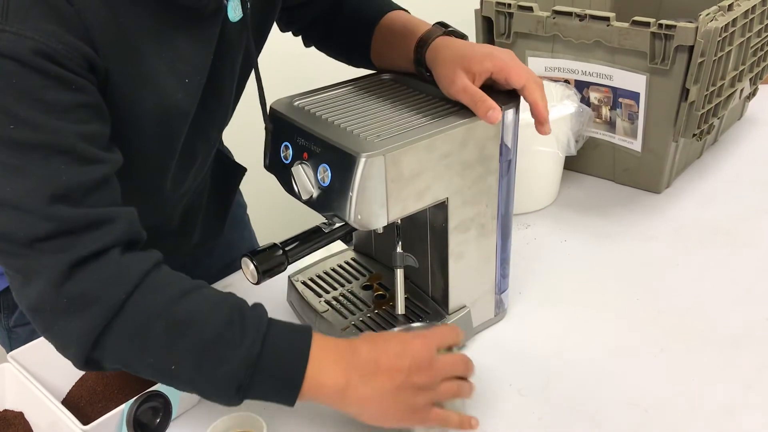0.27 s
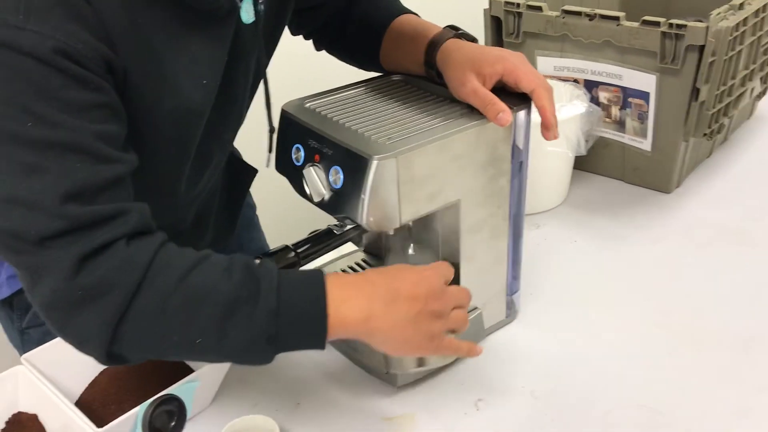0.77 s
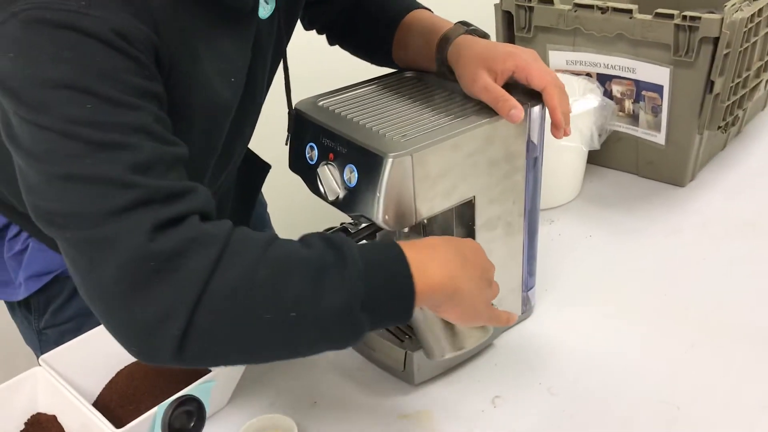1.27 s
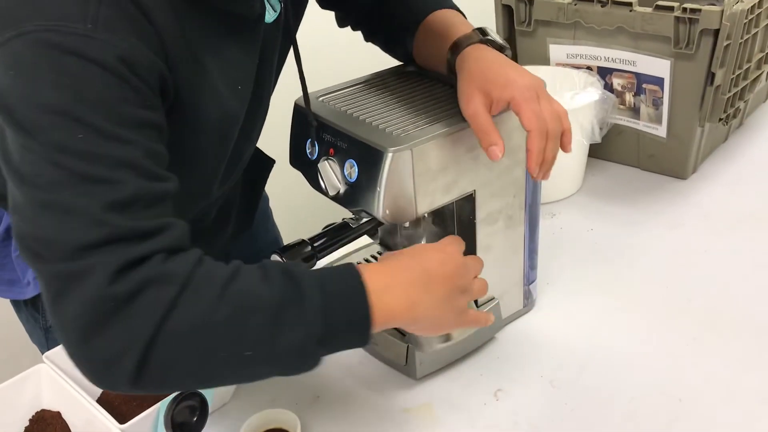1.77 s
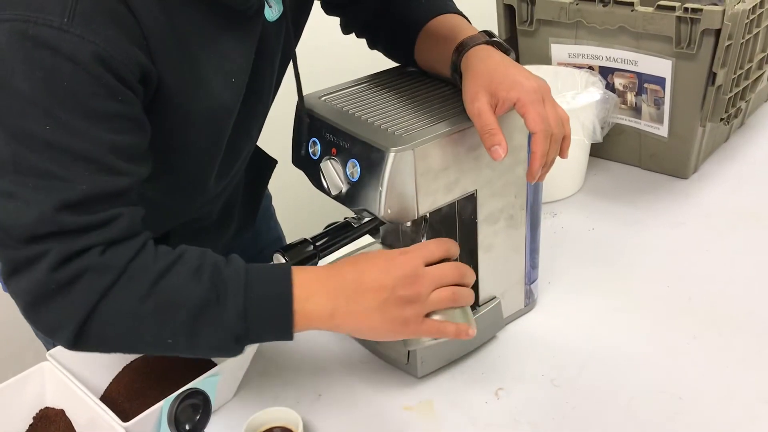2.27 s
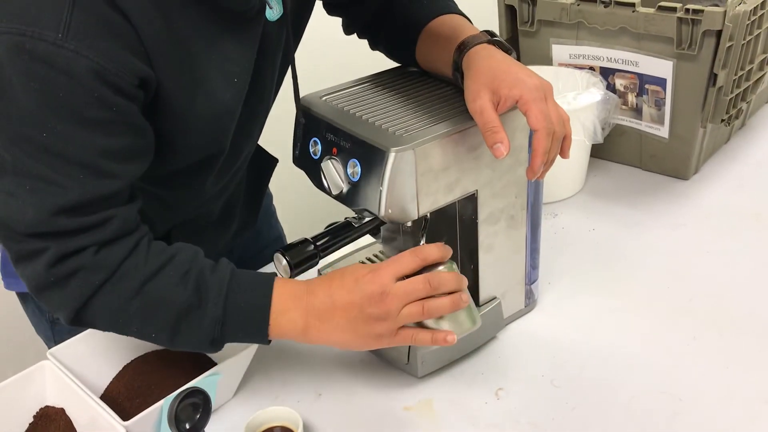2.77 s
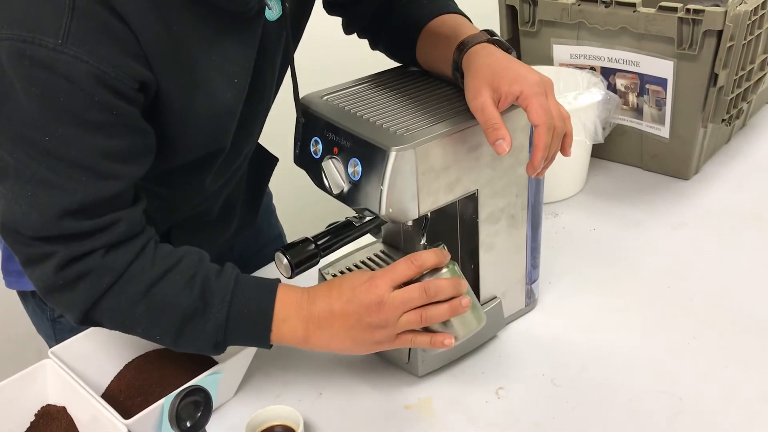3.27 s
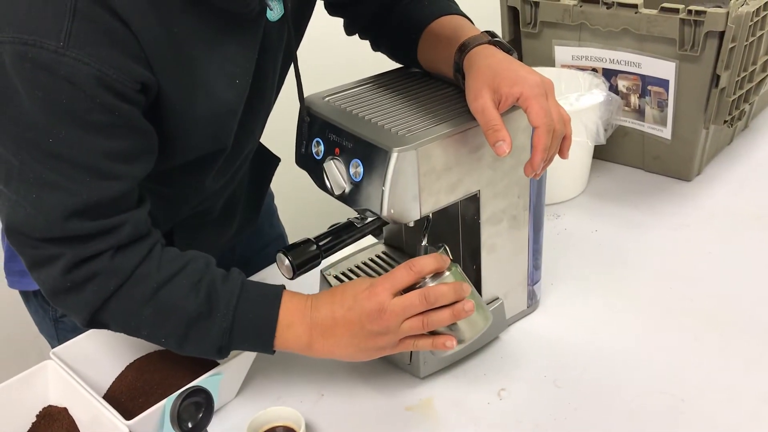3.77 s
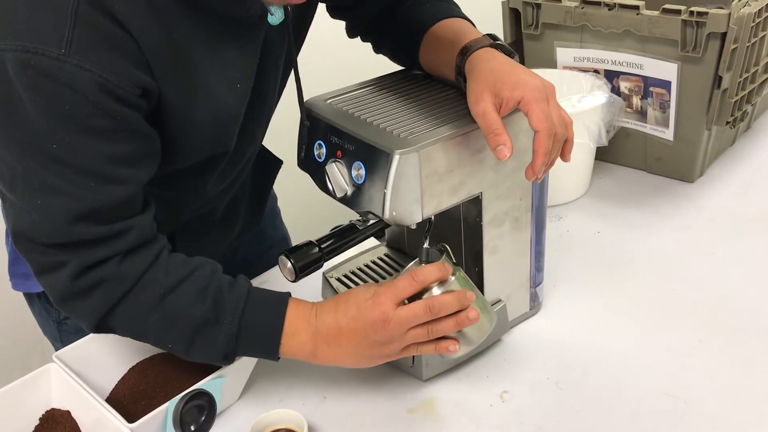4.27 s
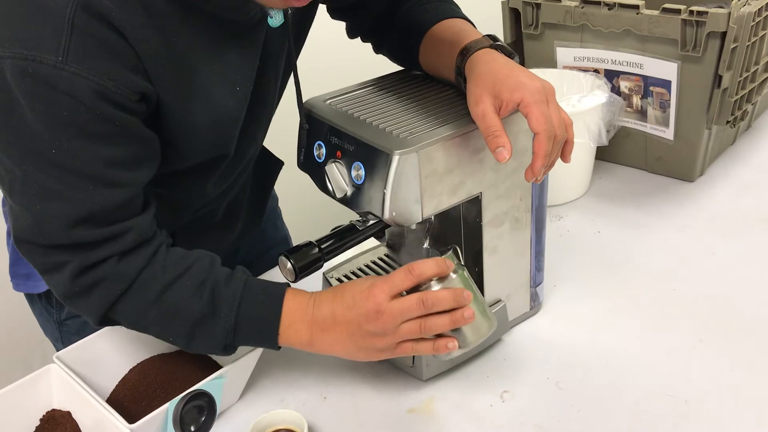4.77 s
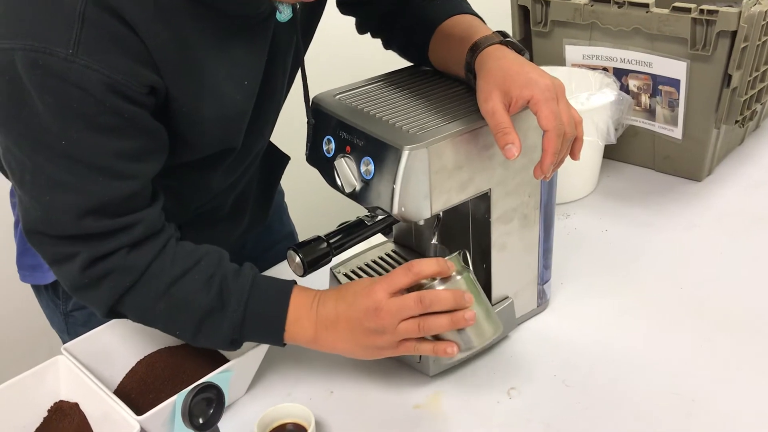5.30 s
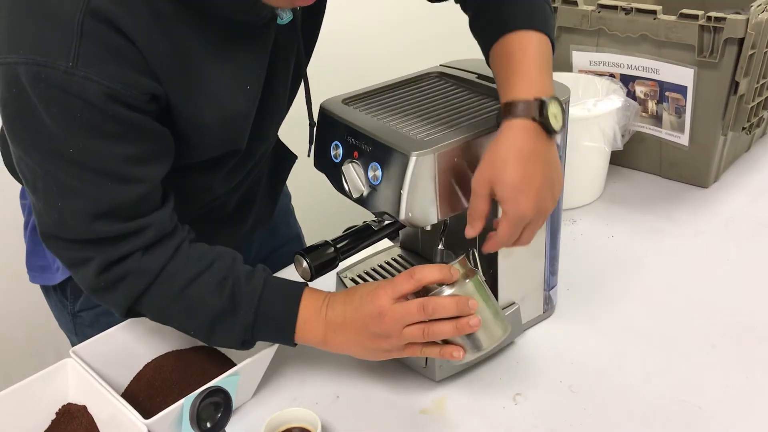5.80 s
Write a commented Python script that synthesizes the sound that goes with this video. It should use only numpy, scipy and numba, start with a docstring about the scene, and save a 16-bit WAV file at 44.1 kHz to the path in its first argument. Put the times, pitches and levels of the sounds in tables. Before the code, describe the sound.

A steam wand's sharp sputtering hiss drops to a muffled, fluttering rush in a metal jug, with a harsh slurping burst later and dull pump thumps.

```python
"""Open steam screeches for nearly a second over a soft pump thump that comes twice a second; then a steel jug
is raised over the wand and the jet rushes into the liquid, slurping when the tip nears the surface.
Jet, hiss, fizz and hum are coloured, flickering noise; steam pockets collapse as noise puffs, bubbles ring as
sines, gulps and the jug's air column are moving resonances, and blows ring the modes of casing and table."""
import sys
import numpy as np
from scipy import signal
from scipy.fft import rfft, irfft
from scipy.io import wavfile
from numba import njit

SR = 44100
rng = np.random.default_rng(int(sys.argv[2]) if len(sys.argv) > 2 else 0)


def digitize_waveform(pressure):
    """Quantize a signal to 16-bit integers and store it at the path in sys.argv[1].

    Rows of a 2-D input are taken as channels; values are limited to [-1, 1].
    """
    field = np.atleast_2d(pressure).T
    bounded = np.clip(field, -1, 1)
    quanta = np.round(bounded * 32767).astype(np.int16)
    wavfile.write(sys.argv[1], SR, quanta)


N = 266319   # length in samples


def from_db(db):
    """Level in dB to amplitude."""
    return 10 ** (np.asarray(db) / 20)


def rms_one(x):
    """Scales a sound to rms 1."""
    return x / np.sqrt(np.mean(x ** 2) + 1e-20)


def in_time(rows):
    """Draws each column of a (time, values...) table as a curve over every sample."""
    s, *columns = np.transpose(rows)
    return [np.interp(np.arange(N) / SR, s, column) for column in columns]


def drift(rate_hz):
    """A slow random wander of rms 1: low-passed noise made at a sixteenth of the sample rate."""
    pole = np.exp(-2 * np.pi * rate_hz * 16 / SR)
    noise = rng.standard_normal(N // 16 + 3002)
    slow = signal.lfilter([1], [1, -2 * pole, pole * pole], noise)[3000:]   # skip the filter's start
    return np.interp(np.arange(N) / 16, np.arange(len(slow)), rms_one(slow))


def ring(clicks, hz, t60_s):
    """A damped mode: a unit click sets a sine of height 1 ringing."""
    pole, angle = from_db(-60 / (t60_s * SR)), 2 * np.pi * hz / SR
    feedback = [1, -2 * pole * np.cos(angle), pole * pole]
    return signal.lfilter([0, np.sin(angle)], feedback, clicks + 1e-18)


def band_pass(x, low_hz, high_hz):
    """Keeps a band of a sound."""
    return signal.sosfilt(signal.butter(2, [low_hz, high_hz], "band", fs=SR, output="sos"), x)


@njit
def glide(x, r, cos_w):
    """A two-pole resonance whose centre moves; gain 1 on top."""
    y = np.zeros(len(x))
    for n in range(2, len(x)):
        y[n] = (1 - r * r) / 2 * (x[n] - x[n - 2]) + 2 * r * cos_w[n] * y[n - 1] - r * r * y[n - 2]
    return y


def moving_peak(x, hz, width_hz, boost):
    """Adds a moving resonance to a sound; rms 1."""
    pole = np.exp(-np.pi * width_hz / SR)
    return rms_one(x + boost * glide(x, pole, np.cos(2 * np.pi * hz / SR)))


def turbulence(colour, together_db, together_hz, patchy_db, patchy_hz):
    """Coloured noise in third-octave slices; all slices surge together and each flickers alone; rms 1."""
    hz = np.arange(N // 2 + 1) * SR / N + 1e-3   # the offset avoids log(0)
    at, level_db = np.transpose(colour)
    curve_db = np.interp(np.log(hz), np.log(at), level_db, -200, -200)
    shaped = rfft(rng.standard_normal(N)) * from_db(curve_db)
    surge_db = together_db * drift(together_hz)
    thirds = 3 * np.log2(hz)
    out = 0
    for centre in np.arange(np.floor(3 * np.log2(at[0])), 3 * np.log2(at[-1]) + 1):
        window = np.cos(np.pi / 2 * np.clip(thirds - centre, -1, 1)) ** 2   # neighbours add up to 1
        flicker_db = patchy_db * drift(patchy_hz)
        out = out + irfft(shaped * window, N) * from_db(surge_db + flicker_db)
    return rms_one(out)


def small_bubbles(base_per_s, low_hz, high_hz, t60_cycles):
    """Random collapses ring at 20 scattered pitches; their rate surges, so they come in swarms; rms 1."""
    sizes = from_db(2.55 * np.minimum(rng.exponential(1, N), 4)) * rng.choice([-1, 1], N)
    born = rng.random(N) < base_per_s * from_db(4.5 * drift(15)) / SR
    dealt = rng.integers(0, 20, N)   # which pitch each bubble takes
    out = 0
    for k, hz in enumerate(np.geomspace(low_hz, high_hz, 20)):
        out = out + ring(sizes * born * (dealt == k), hz, t60_cycles / hz)
    return rms_one(out)


# level of the low rumble throughout: t/s, level/dB
RUMBLE = [(0, -37), (.12, -52), (.34, -49.5), (.65, -47), (1.1, -54), (1.6, -48), (1.97, -64.5),
          (2.35, -54), (3.1, -54.5), (4.0, -55.5), (4.3, -45.5), (5.2, -50.5), (5.5, -41.5), (6.04, -51)]
# rumble spectrum: f/Hz, level/dB per Hz
RUMBLE_COLOUR = [(18, -34), (30, -40), (65, -7), (217, -3), (328, -3.5), (495, -10), (560, 0), (678, -11),
                 (800, -2.5), (1040, 4), (1760, -120)]


def rumble():
    """A low rumble of wind and handling: slowly surging coloured noise."""
    level_db, = in_time(RUMBLE)
    return from_db(level_db) * turbulence(RUMBLE_COLOUR, 3.1, 4.1, 1.9, 6.1)


# blows of one pump stroke, one row each: low, middle and upper mode drive/dB, rattle drive/dB
STROKE = [(-43.5, -44.5, -49.5, -68), (-56, -63, -38, -39), (-56.5, -36, -40.5, -32.5),
          (-81, -50, -41, -35.5), (-48.5, -37, -47, -39)]
# delay of each blow after the stroke begins: t/s
BLOW_DELAYS_S = 0, .012, .034, .05, .068
# modes of casing and table: f/Hz, level/dB relative to the blow, t60/s
CASING = [(53.43, 2.5, 1.6), (48.5, 3, 0.25), (71.2, -6, 1.4), (120, -21, 1.09), (137.5, -14.5, 1.95),
          (150, 0.5, 0.073), (158.7, -2.5, 0.23), (205.4, -8.5, 0.53), (253.5, -5.5, 0.45),
          (297.5, 0.5, 0.14), (325.3, -6, .18), (400, -56, 0.15)]
FIRST_STROKE_S, STROKE_PERIOD_S, STROKE_SPREAD_DB = .143, .5, 3.6
CONTACT_HZ = 270   # the blows are soft: slow pushes rather than clicks


def pump():
    """Each stroke lands a run of blows, uneven in level, that ring the casing and stir a short rattle."""
    starts = np.arange(FIRST_STROKE_S - STROKE_PERIOD_S, N / SR, STROKE_PERIOD_S)
    lead = SR // 2      # the stroke before the start still rings
    blow_at = [np.round((starts + delay) * SR).astype(int) + lead for delay in BLOW_DELAYS_S]
    thump = 0
    for hz, level_db, t60_s in CASING:
        clicks = np.zeros(N + 2 * lead)
        group = int(hz > 90) + int(hz > 180)   # low, middle or upper modes
        for at, blow in zip(blow_at, STROKE):
            spread_db = STROKE_SPREAD_DB * rng.standard_normal(len(at))
            clicks[at] = from_db(blow[group] + level_db + spread_db)
        thump = thump + ring(clicks, hz, t60_s)
    thump = signal.sosfilt(signal.butter(1, CONTACT_HZ, fs=SR, output="sos"), thump)

    hits = np.zeros(N + 2 * lead)
    for at, (*_, rattle_db) in zip(blow_at, STROKE):
        hits[at] = from_db(rattle_db)
    fade = from_db(-60 / (.06 * SR))   # 60 dB down in 60 ms
    rattle = signal.lfilter([1], [1, -fade], hits) * rng.standard_normal(len(hits))
    out = thump + 3 * band_pass(rattle, 500, 2000)
    return out[lead:lead + N]


# knocks of jug and hand, and one bubbly bloop near 2 kHz at 0.78 s:
# t/s, level/dB at the start, low f/Hz, high f/Hz, t60/s
KNOCKS_AND_BLOOP = [(.003, -30, 400, 1540, 0.16), (0.571, -43, 150, 360, 0.22),
                    (0.781, -31, 1750, 2100, 0.15)]


def knocks_and_bloop():
    """Each knock or bloop is a band of noise that dies away."""
    out, t = np.zeros(N), np.arange(SR // 4) / SR
    for s, level_db, low_hz, high_hz, t60_s in KNOCKS_AND_BLOOP:
        band = rms_one(band_pass(rng.standard_normal(len(t)), low_hz, high_hz))
        out[round(s * SR):][:len(t)] += band * from_db(level_db - 60 * t / t60_s)
    return out


# gulps that make the air column sing out: t/s, length/s, peak level/dB, start f/Hz, end f/Hz
GULPS = [(0.864, 0.052, -27, 1076, 867), (1.97, 0.043, -40.5, 1010, 1070),
         (2.055, 0.047, -32.5, 1030, 1100), (2.235, 0.053, -38.5, 1000, 1180), (2.874, .05, -35, 850, 990),
         (2.95, 0.047, -36.5, 1040, 930), (3.431, 0.037, -36.5, 1044, 1070),
         (5.656, 0.063, -32, 1015, 1060), (5.776, 0.037, -33, 923, 983)]
GULP_WIDTH_HZ = 122   # of each of two resonances in a row


def gulps():
    """Each gulp is a swell of noise in a narrow resonance that slides, as the air column sings out."""
    out = np.zeros(N)
    pole = np.exp(-np.pi * GULP_WIDTH_HZ / SR)
    for s, length_s, peak_db, start_hz, end_hz in GULPS:
        u = np.linspace(-1, 1, 2 * round(length_s * SR))   # the first half only settles the filter
        cos_w = np.cos(2 * np.pi * (start_hz + (end_hz - start_hz) * u) / SR)
        noise = rng.standard_normal(len(u))
        tone = glide(glide(noise, pole, cos_w), pole, cos_w)[len(u) // 2:]
        swell = np.sin(np.pi * u[len(u) // 2:])
        out[round(s * SR):][:len(tone)] += from_db(peak_db) * swell * rms_one(tone)
    return out


# large bubbles: t/s, level/dB, starting f/Hz
BLOOPS = [(.273, -17, 2290), (0.319, -23, 3020), (0.437, -22, 2540), (1.1, -22, 2670), (1.368, -24, 3270),
          (1.394, -18, 3430), (1.413, -16, 2920), (2.033, -11.5, 2370), (2.336, -26, 1000),
          (2.362, -28, 973), (4.065, -21, 3750), (4.167, -25, 2530), (4.2, -14, 3570), (4.235, -22, 2980),
          (4.312, -11, 2800), (4.379, -16, 2140), (4.585, -11, 3080), (4.644, -18, 3520), (4.862, -26, 783),
          (5.0, -20.5, 916), (5.231, -24.5, 2030), (5.319, -25, 3370), (5.414, -18, 893), (5.487, -20, 978),
          (5.579, -19, 3050), (5.631, -25.5, 1035), (5.713, -19, 876)]
BLOOP_T60_CYCLES = 48


def bloops():
    """A large bubble rings briefly, its pitch rising as it shrinks."""
    out, t = np.zeros(N), np.arange(6000) / SR
    for s, level_db, hz in BLOOPS:
        i, turns = round(s * SR), hz * t
        attack = 1 - np.exp(-turns / 1.67)
        shape = attack * from_db(level_db - 60 * turns / BLOOP_T60_CYCLES)
        bubble = shape * np.sin(2 * np.pi * turns * (1 + 0.001 * turns))
        out[i:i + len(t)] += bubble[:N - i]
    return out


# the strongest steam pockets collapsing: t/s, peak level/dB, brightest f/Hz
PUFFS = [(1.012, -35.5, 5370), (1.121, -34, 5270), (1.251, -32.5, 2980), (1.422, -30, 3190),
         (1.446, -28, 3020), (2.284, -34, 3500), (2.458, -33, 3020), (2.502, -37, 4500),
         (2.8425, -32.5, 3450), (2.918, -37, 3500), (2.991, -38, 5240), (3.078, -34.5, 5950),
         (3.229, -35.5, 3380), (3.453, -34.5, 6200), (3.542, -34.5, 3360), (3.75, -36.5, 4630),
         (4.115, -32.5, 3470), (4.313, -23, 6150), (4.4, -26, 8750), (4.444, -23, 6170),
         (4.524, -27.5, 6190), (4.575, -29.5, 3100), (4.603, -22.5, 7240), (5.097, -34, 6400),
         (5.344, -27.5, 6300), (5.5066, -32, 3440), (5.5404, -32, 3530), (5.6075, -31.5, 6300),
         (5.634, -34, 6360), (5.711, -32, 6200), (5.764, -33, 6340), (5.81, -38, 6330), (5.889, -30, 7050),
         (5.938, -31, 6200), (6.002, -34, 6200)]
# weaker pockets, at a nearly even pace once the tip is drowned
POCKETS_FROM_S, POCKET_COUNT, POCKET_GAP_S, POCKET_JITTER_S = .925, 128, .04, 0.0096
POCKET_DB, POCKET_SPREAD_DB, POCKET_HZ = -40.5, 1.5, (3300, 4500, 5550, 6200)
POCKET_CLEAR_S = 0.027   # distance kept from strong pockets


def pockets():
    """Rows of the weaker pockets; none falls right beside a strong one."""
    jitter, spread = rng.standard_normal((2, POCKET_COUNT))
    hz = rng.choice(POCKET_HZ, POCKET_COUNT)
    s = POCKETS_FROM_S + POCKET_GAP_S * np.arange(POCKET_COUNT) + POCKET_JITTER_S * jitter
    peak_db = POCKET_DB + POCKET_SPREAD_DB * spread
    free = np.abs(s[:, None] - np.transpose(PUFFS)[0]).min(axis=1) > POCKET_CLEAR_S
    return list(zip(s[free], peak_db[free], hz[free]))


# puff spectrum before each puff's own tint: f/Hz, level/dB per Hz
PUFF_COLOUR = [(1180, -66), (2000, 6), (2920, 3), (4310, 2), (6080, 4.5), (6690, -3), (8220, 4),
               (10300, -18), (15700, -5)]
PUFF_RISE_S = 0.006


def puffs():
    """Each collapsing pocket is a quick swell of bright noise, strongest around a pitch of its own."""
    out, u = np.zeros(N), np.arange(2000) / SR / PUFF_RISE_S
    swell = (u * np.exp(1 - u)) ** 2   # peaks at 1
    noise = turbulence(PUFF_COLOUR, .6, 50, 2.5, 40)
    for s, peak_db, hz in PUFFS + pockets():
        i = min(round(s * SR), N - 1)
        piece = noise[i:i + len(u)]
        peak = signal.lfilter(*signal.iirpeak(hz, 3.5, fs=SR), piece)
        tinted = .6 * piece + 0.78 * peak
        out[i:i + len(u)] += from_db(peak_db) * swell[:N - i] * tinted
    return out


# free jet in air: t/s, level/dB, screech centre f/Hz
JET = [(0, -23.5, 5950), (.11, -23.5, 6400), (.19, -20.5, 6000), (.25, -25.5, 5940), (.3, -23, 5950),
       (.42, -25, 6130), (.62, -24.5, 6420), (.76, -24, 6400), (.82, -29, 5400), (.92, -64, 5460)]
# jet spectrum before the screech: f/Hz, level/dB per Hz
JET_COLOUR = [(880, -65), (1500, -56), (2120, -12), (2430, -9.5), (2840, -16.5), (3320, -31), (4330, -19),
              (5540, -2.5), (6050, 3), (7740, -14), (8880, -4.5), (10700, -14), (12500, -11.5),
              (14500, -12), (15700, -14)]


def free_jet():
    """Steam screeches from the open tip, sputtering with droplets, until the tip is drowned."""
    end_s, _, end_hz = JET[-1]
    level_db, screech_hz = in_time(JET + [(end_s + .05, -120, end_hz)])   # fade out after the last row
    noise = turbulence(JET_COLOUR, 1.7, 30, 1.8, 55)
    return from_db(level_db) * moving_peak(noise, screech_hz, 420, 0.83)


# the tip breaks the surface and sucks air: t/s, hold/s, hiss level/dB, sizzle level/dB, fizz level/dB
SLURPS = [(1.399, 0.071, -44.5, -52, -37.5), (1.847, 0.11, -45.5, -67, -57), (2.137, 0.059, -44, -61, -39),
          (4.055, 0.011, -45, -39.5, -35), (4.156, 0.015, -40, -48, -32), (4.188, 0.012, -33, -44, -33),
          (4.226, .06, -31, -34, -32), (4.3, 0.059, -29.5, -34, -27.5), (4.377, 0.12, -29.5, -33.5, -30.5),
          (4.503, 0.032, -27, -33, -31), (4.578, 0.04, -28.5, -43, -32), (4.594, 0.068, -30, -34, -33),
          (5.37, 0.032, -41.5, -45, -63), (5.43, 0.015, -43, -53, -57), (5.489, 0.022, -63, -55, -36),
          (5.52, .07, -64, -57, -34)]
SLURP_ATTACK_S, SLURP_RELEASE_DB_PER_S = 0.0066, 597


def slurps():
    """Power that the slurps add to hiss, sizzle and fizz: quick attack, hold, release."""
    out, t = np.zeros((3, N)), np.arange(N) / SR
    for s, hold_s, *level_db in SLURPS:
        attack = np.clip((t - s) / SLURP_ATTACK_S, 0, 1)
        release = from_db(-SLURP_RELEASE_DB_PER_S * np.clip(t - s - hold_s, 0, 1))
        out += (from_db(level_db)[:, None] * attack * release) ** 2
    return out


def throb(per_s, jitter, depth_db):
    """A gain that pulses as the steam pocket at the tip grows and bursts at a nearly even pace."""
    turns = np.cumsum(per_s * (1 + jitter * drift(8.2))) / SR
    return from_db(depth_db * np.cos(np.pi * turns) ** 6)


# jet in the jug, treble between slurps: t/s, surface hiss level/dB, sizzle level/dB
SURFACE = [(0, -34.5, -40), (.4, -33.5, -54), (.76, -39, -29), (.84, -34, -39.5), (.89, -51, -49),
           (1.16, -47.5, -48.5), (1.36, -58, -49), (1.8, -53, -56), (2.25, -48.5, -50.5), (3.0, -54.5, -51),
           (4.04, -58.5, -53.5), (4.7, -42.5, -37.5), (4.78, -65, -46.5), (4.85, -53, -40),
           (5.03, -54, -41), (5.15, -55, -46.5), (6.04, -57.5, -49)]
# fizz under the surface, brightest at a pitch set by the tip's depth: t/s, level/dB, centre f/Hz
FIZZ = [(0, -39, 2790), (.82, -38, 3000), (.89, -45, 3200), (1.36, -40.5, 3130), (1.55, -46.5, 2800),
        (1.75, -48.5, 2740), (1.97, -37, 2450), (2.2, -39, 2630), (2.33, -44.5, 2720), (2.5, -37, 3020),
        (2.68, -43.5, 2550), (2.88, -38, 3130), (3.1, -42, 2700), (3.4, -40, 2800), (3.52, -43.5, 3100),
        (4.0, -44, 3300), (4.6, -37, 3300), (4.75, -49.5, 3300), (5.15, -44.5, 3200), (5.43, -45, 3600),
        (5.75, -41.5, 2850), (6.04, -44, 3470)]
# the jug's air column, shifting as the jug tilts and fills: t/s, level/dB, centre f/Hz
HUM = [(0, -53, 920), (.12, -64, 920), (.29, -36, 950), (.55, -62, 970), (.8, -36.5, 1010),
       (.99, -42.5, 870), (1.36, -42, 960), (1.5, -41, 880), (1.7, -42, 1020), (2.2, -40.5, 1110),
       (2.66, -42, 930), (2.92, -45, 980), (3.95, -51.5, 910), (4.17, -38.5, 980), (4.7, -40.5, 1000),
       (4.9, -44, 810), (5.25, -47.5, 980), (5.45, -42, 895), (5.7, -37.5, 970), (6.04, -51, 900)]
# spectra of the noise in surface hiss, sizzle, fizz and hum: f/Hz, level/dB per Hz
HISS_COLOUR = [(2350, -32), (4000, -1.5), (5030, -9), (6140, 5), (6580, -14), (7420, -6.5), (7720, -70),
               (8370, -2), (10900, -4.5), (12100, -1.5), (15700, -9)]
SIZZLE_COLOUR = [(2350, -56), (4000, -5), (4580, 3.5), (5070, -26), (5810, 8), (6080, 5.5), (7200, 5),
                 (9330, -5), (11000, -32), (14300, -58), (22000, -120)]
FIZZ_COLOUR = [(760, -2), (1300, -7), (1760, -4.5), (2930, 1.5), (3190, -7.5), (3500, 0.5), (4010, -10),
               (4990, -5), (6080, -17.5), (6680, -57), (7650, -16.5), (10200, -15), (15700, -41)]
HUM_COLOUR = [(350, -91), (600, -8.5), (678, -76), (736, 2.5), (900, 5.5), (1040, -1), (1140, -8),
              (1450, -6), (1700, -5.5), (2210, -59), (3740, -120)]
FIZZ_WANDER, HUM_WANDER = 0.069, 0.032   # random sway of the centres, rms as a share
SLURP_LOW_CUT_HZ = 1630


def jug():
    """Hiss and sizzle at the surface, fizz below it, the air column humming; slurped fizz has no lows."""
    hiss_db, sizzle_db = in_time(SURFACE)
    fizz_db, fizz_hz = in_time(FIZZ)
    hum_db, hum_hz = in_time(HUM)
    hiss_power, sizzle_power, fizz_power = slurps()
    hiss_gain = np.sqrt(from_db(hiss_db) ** 2 + hiss_power)
    sizzle_gain = np.sqrt(from_db(sizzle_db) ** 2 + sizzle_power)

    pulse = throb(28, 0.2334, depth_db=1.5)
    hiss = pulse * turbulence(HISS_COLOUR, 3.2, 93, 2.23, 28)
    sizzle = turbulence(SIZZLE_COLOUR, 2.1, 63, 3.8, 32) + 0.76 * small_bubbles(300, 4294, 9140, 110)
    sizzle = pulse * sizzle

    fizz = turbulence(FIZZ_COLOUR, 2.1, 24.0, 3.5, 24.0) + 0.64 * small_bubbles(250, 1980, 4710, 72)
    fizz = moving_peak(fizz, fizz_hz * (1 + FIZZ_WANDER * drift(8.8)), 790, 1.74)
    low_cut = signal.butter(4, SLURP_LOW_CUT_HZ, "high", fs=SR, output="sos")
    slurped_fizz = signal.sosfilt(low_cut, fizz)

    hum = turbulence(HUM_COLOUR, 4.4, 17, 1.05, 6.7) + 0.44 * small_bubbles(240, 766, 1268, 52)
    hum = moving_peak(hum, hum_hz * (1 + HUM_WANDER * drift(9.7)), 240, 1.0)

    surface = hiss_gain * hiss + sizzle_gain * sizzle
    below = from_db(fizz_db) * fizz + np.sqrt(fizz_power) * slurped_fizz
    return surface + below + from_db(hum_db) * hum


# echoes off the machine's front, the table and the body nearby: delay t/s, level/dB
ECHOES = [(.0007, -8.5), (.0016, -8.5), (.0027, -13), (.0041, -33), (.0059, -14), (.0082, -14),
          (0.0114, -10)]


def nearby_echoes(x, sway_s):
    """Close reflections comb the sound; the comb shifts as hand and jug sway. Power is roughly kept."""
    fine, n = signal.resample_poly(x, 4, 1), np.arange(N)   # oversampled for smooth moving delays
    fine_n = np.arange(4 * N) / 4
    out, power = x, 1
    for delay_s, level_db in ECHOES:
        source_n = n - (delay_s + sway_s * drift(0.85)) * SR
        out = out + from_db(level_db) * np.interp(source_n, fine_n, fine, 0)
        power += from_db(level_db) ** 2
    return out / np.sqrt(power)


def scene():
    """All sources at one microphone; only the steam and liquid layers in the first line get the echoes."""
    steam = nearby_echoes(free_jet() + jug() + puffs() + bloops() + gulps(), sway_s=.00009)
    return (steam + rumble() + pump() + knocks_and_bloop())[None]


CUTOFF_HZ = 15790


def record(dry):
    """The deep bass and the top are cut."""
    dry = signal.sosfilt(signal.butter(4, 47, "high", fs=SR, output="sos"), dry)
    return signal.sosfilt(signal.ellip(12, .3, 75, CUTOFF_HZ, fs=SR, output="sos"), dry)


dry = scene()
out = record(dry)
digitize_waveform(out)
```